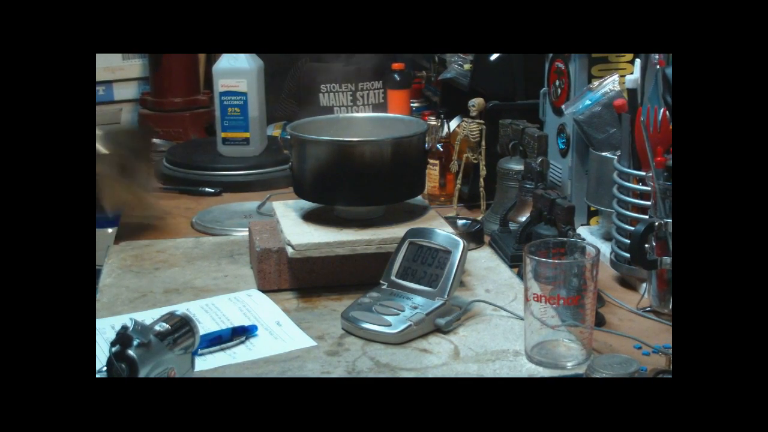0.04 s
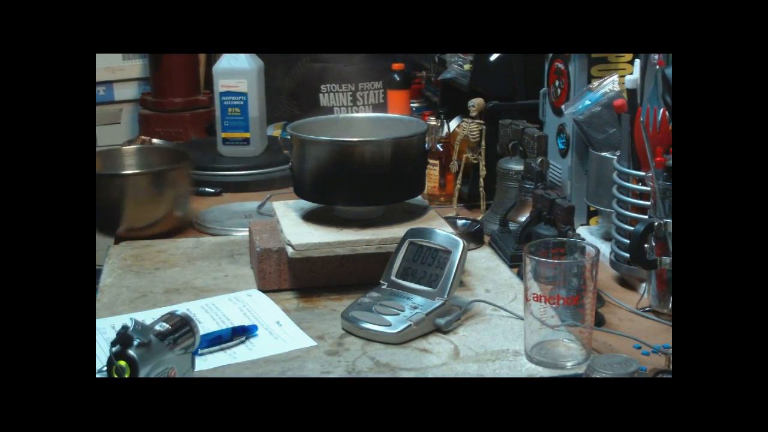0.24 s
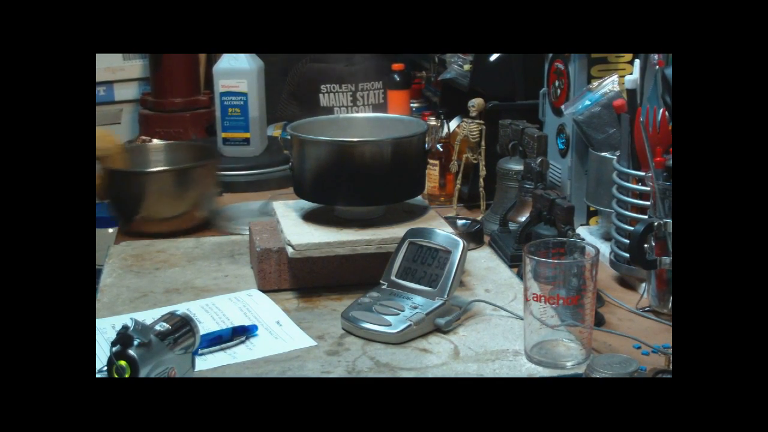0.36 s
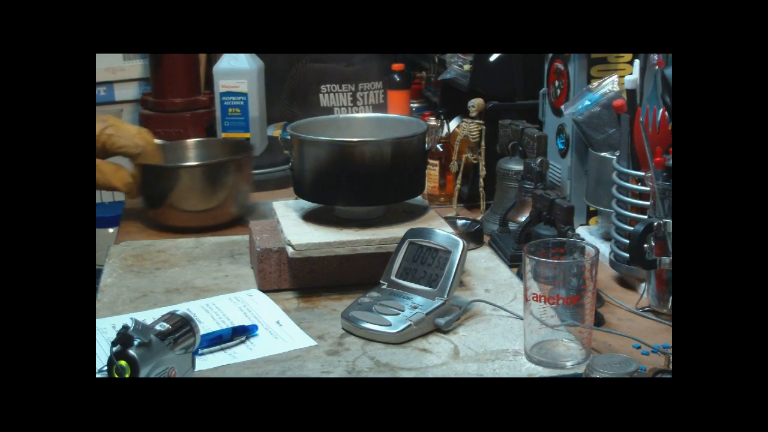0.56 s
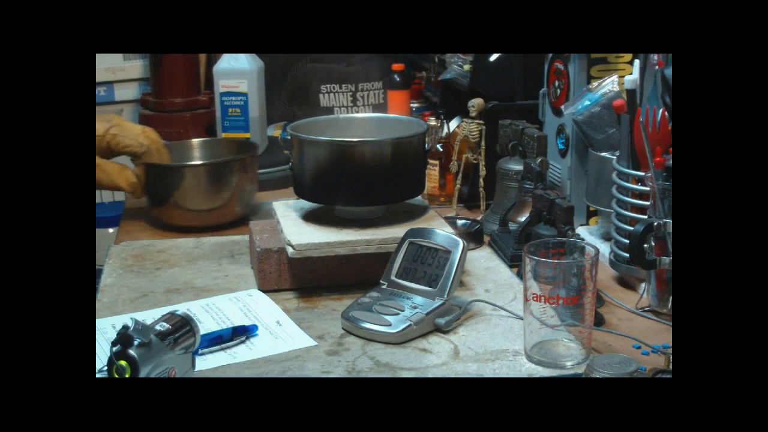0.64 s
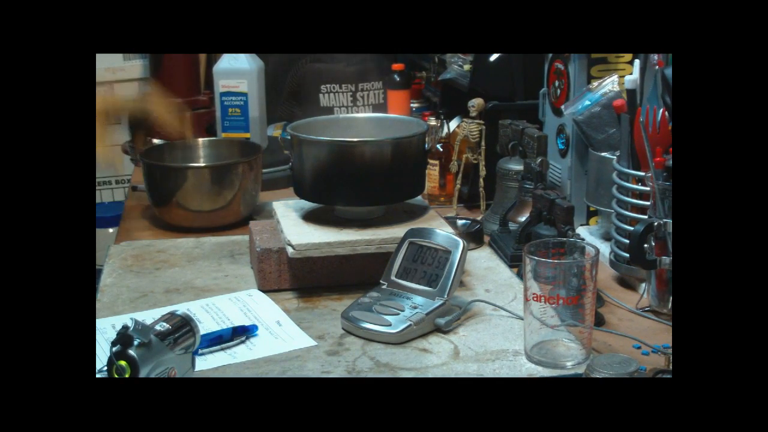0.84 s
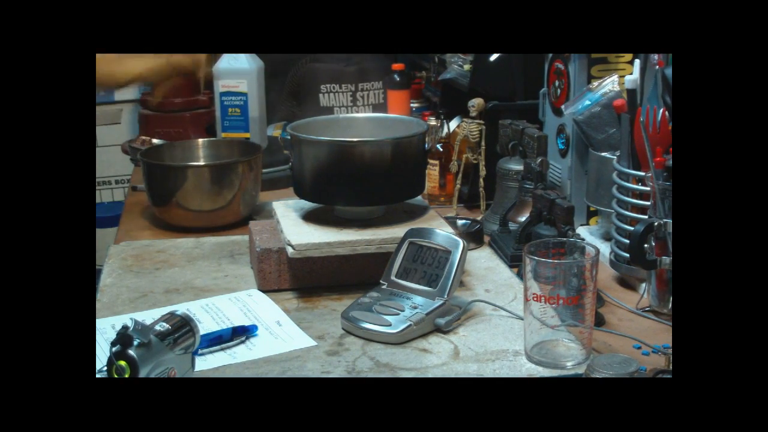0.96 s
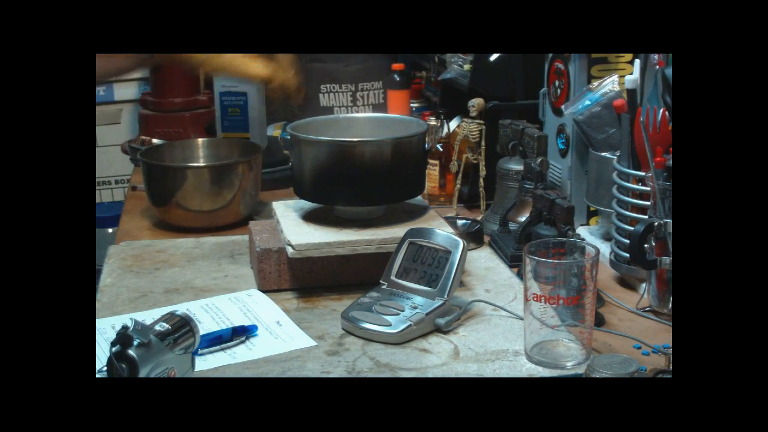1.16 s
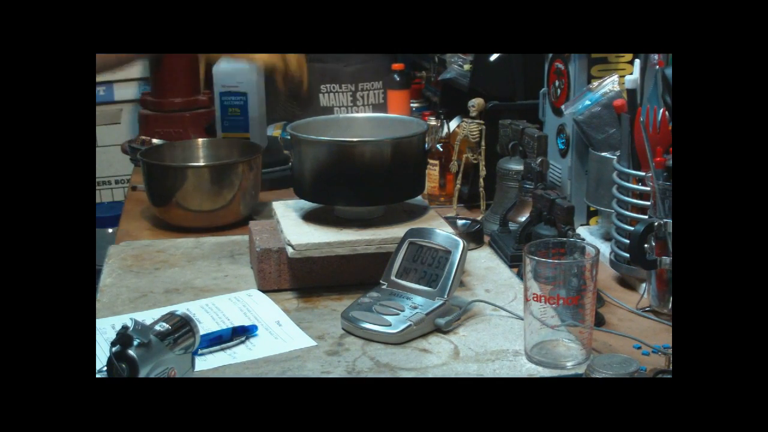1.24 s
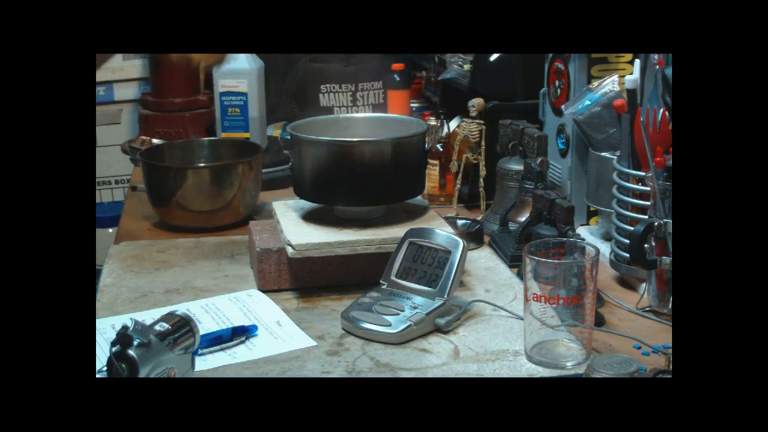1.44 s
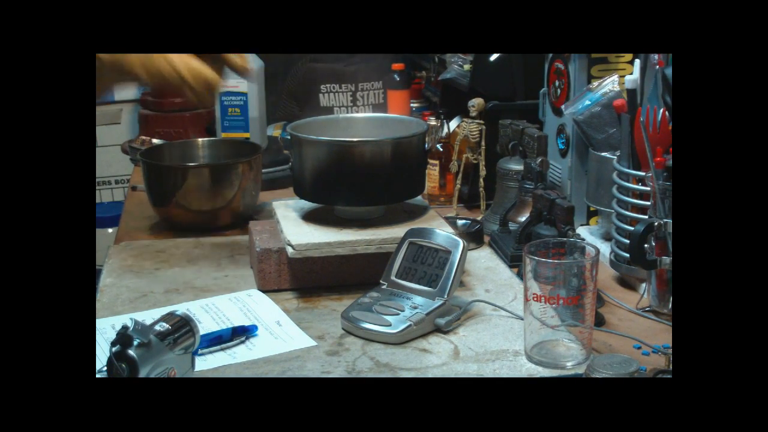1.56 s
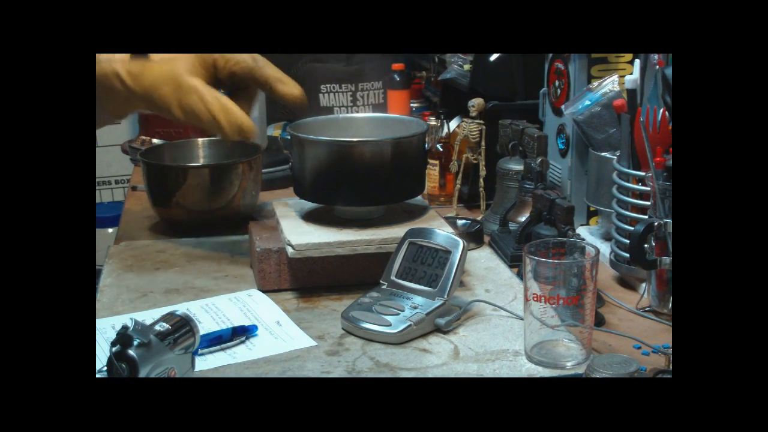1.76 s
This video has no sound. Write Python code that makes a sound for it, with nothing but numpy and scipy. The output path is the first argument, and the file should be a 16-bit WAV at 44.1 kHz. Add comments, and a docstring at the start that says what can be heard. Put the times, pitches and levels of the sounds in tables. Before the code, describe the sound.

Metal bowl lands on a bench with two quick hits, rattles briefly and settles indoors

```python
"""A low rumble and hiss fill a small room, where a steel bowl is set down on a workbench.
Its base knocks first: decaying modes give a hollow note, shaped noise the thuds, uneven noise the scuffs.
It then tips flat and chatters, each contact ringing the wall's modes in a bright clank, and shifts once more.
Last, a gloved hand taps and brushes something faintly, in short bands of noise.
Reflections, an echo and a tail place the bowl in the room; the rumble and hiss stay outside them."""
import sys
import numpy as np
from scipy import signal
from scipy.fft import rfft, irfft
from scipy.io import wavfile
from scipy.ndimage import uniform_filter1d, minimum_filter1d

SR = 44100
rng = np.random.default_rng(int(sys.argv[2]) if len(sys.argv) > 2 else 0)


def log_audio(samples):
    """Write samples as a 16-bit WAV file to the path given in sys.argv[1]."""
    # one column per channel
    frames = np.atleast_2d(samples).T
    # limit to full scale, then quantise
    limited = np.clip(frames, -1, 1)
    pcm = np.round(limited * 32767).astype(np.int16)
    wavfile.write(sys.argv[1], SR, pcm)


N = 79380  # samples, 1.8 s
TIME = np.arange(N) / SR  # seconds
SOFT_TOP_HZ = 6950  # top of the floor, scuffs and handling


def undb(db):
    """Amplitude ratio of a level in dB."""
    return 10 ** (np.asarray(db) / 20)


def unit(x):
    """Scale to an RMS of one."""
    return x / np.sqrt(np.mean(x ** 2))


def fade(t60):
    """Exponential decay, 60 dB down after t60 seconds."""
    return np.exp(-np.log(1000) * TIME / t60)


def delayed(x, seconds):
    """The same sound, starting later."""
    return np.concatenate([np.zeros(int(seconds * SR)), x])[:N]


def lowpass(x, hz):
    """Steep elliptic cut of everything above hz."""
    return signal.sosfilt(signal.ellip(8, .2, 70, hz, fs=SR, output="sos"), x)


def spectrum_level(points, f):
    """Amplitude at frequencies f, from (Hz, dB) points joined on a log frequency axis."""
    hz, db = np.array(points, float).T
    return undb(np.interp(np.log(f), np.log(hz), db))


def noise(points):
    """Noise with a spectrum of (Hz, dB) points."""
    f = np.maximum(np.fft.rfftfreq(N, 1 / SR), 1)
    return unit(irfft(rfft(rng.standard_normal(N)) * spectrum_level(points, f), N))


def band(hz, width_hz):
    """Noise through one broad resonance, twice for steep sides."""
    f = np.maximum(np.fft.rfftfreq(N, 1 / SR), 1)
    resonance = 1 / (1 + 1j * (f - hz ** 2 / f) / width_hz)
    return unit(irfft(rfft(rng.standard_normal(N)) * resonance ** 2, N))


def mode(hz, t60):
    """One decaying partial."""
    return np.sin(2 * np.pi * hz * TIME) * fade(t60)


def ring(modes):
    """All modes of a body after one blow."""
    return sum(undb(db) * mode(hz, t60) for hz, db, t60 in modes)


def partials(points, spacing_hz=62, top_hz=7500):
    """A crowd of unevenly spaced steady partials under a spectrum of (Hz, dB) points."""
    grid = np.arange(points[0][0], top_hz, spacing_hz)
    offset, phase = rng.random((200, 2))[:len(grid)].T
    f = grid + spacing_hz * offset
    lines = np.zeros(N // 2 + 1, complex)
    lines[(f * N / SR).astype(int)] = spectrum_level(points, f) * np.exp(2j * np.pi * phase)
    return unit(irfft(lines, N))


# Steady rumble and hiss of the room. Each row: frequency in Hz, relative level per Hz in dB.
FLOOR_SPECTRUM = [(10, -7.5), (22, 2), (55, -0.5), (81, -12), (132, -14), (220, -18.5), (450, -24.5),
                  (900, -27.5), (1500, -31), (4000, -32.5), (7000, -37)]
FLOOR_DB = -46.5


def room_floor():
    """Steady noise, strongest in the bass, under the whole scene."""
    return undb(FLOOR_DB) * lowpass(noise(FLOOR_SPECTRUM), SOFT_TOP_HZ)


# The base lands and rocks on the bench. Each row: start in seconds, relative level in dB.
BASE_LANDINGS = [(0.158, -1.5), (.1835, -6.5), (.1995, -25)]
# Modes of the base, loaded by the bench. Each row: frequency in Hz, relative level in dB, t60 in seconds.
BASE_MODES = [(149, -18, 0.11), (403, -7, 0.059), (512, -6.5, 0.041), (640, -3, 0.054), (685, 2.5, 0.049),
              (884.7, -15.5, 0.27), (1732, -20.5, 0.29), (1862, -33, 0.15), (2210, -30, 0.076),
              (2867, -19.5, 0.12), (2947, -18, 0.1), (4530, -37.5, 0.088), (4270, -50, .06)]
# Colour of the knock's contact noise. Each row: frequency in Hz, relative level in dB.
THUD_SPECTRUM = [(60, -10.5), (150, -3), (260, -8), (400, -0.5), (880, -1.5), (1000, -16), (2300, -21.5),
                 (2550, -29), (2950, -24.5), (3550, -28), (3900, -35), (4600, -25), (5300, -36.5),
                 (6400, -33.5), (8000, -66), (15000, -68)]
NOTE_DB, THUD_DB, THUD_T60_S = -12.5, -17.5, 0.1
KNOCK_PUSH_S = 0.0012  # time constant of the onset


def knock():
    """The base meets the bench: a hollow note on landing, and a dull thud each time it rocks."""
    push = 1 - np.exp(-TIME / KNOCK_PUSH_S)
    first_landing_s = BASE_LANDINGS[0][0]
    note = -undb(NOTE_DB) * delayed(push * ring(BASE_MODES), first_landing_s)
    # where thuds overlap, the stronger one sets the level
    thud = push * fade(THUD_T60_S)
    thuds = np.max([undb(db) * delayed(thud, start) for start, db in BASE_LANDINGS], axis=0)
    return note + undb(THUD_DB) * noise(THUD_SPECTRUM) * thuds


# The base scuffs along the bench. Each row: start in seconds, length in seconds, scrape level in dB,
# centre in Hz, resonance width in Hz, level of the steel's rasp in dB; friction varies both levels.
BASE_SCUFFS = [(0.198, 0.092, -46.5, 694, 324, -57), (0.272, .016, -36, 697, 120, -54.5),
               (.37, 0.059, -46, 690, 900, -41.5), (0.425, 0.1085, -49, 646, 1200, -43),
               (0.52, 0.1, -49, 710, 1200, -51)]
# The bench rumbles as the base drags over it. One row: start in seconds, length in seconds, level in dB,
# centre in Hz, resonance width in Hz.
BENCH_DRAG = (.215, .075, -44, 150, 170)
# Colour of the steel's rasp and shimmer. Each row: frequency in Hz, relative level in dB.
SHIMMER_SPECTRUM = [(300, -14), (1200, -3), (2200, -2), (3600, -4), (3850, -32), (4180, -32), (4300, -9),
                    (4850, -10), (5000, -34), (5300, -34), (5420, -14), (5850, -13), (6050, -32),
                    (6500, -34), (6640, -12), (7000, -13), (7300, -36), (15000, -60)]
SCUFF_ROUGH_DB = 1.5  # RMS swing of the friction


def scuffs(grip_hz=50, edge_s=0.0085):
    """Uneven friction under the base: a dull scrape, a rasp of the steel and a rumble in the bench."""
    def gate(start, length):
        rise = np.tanh((TIME - start) / edge_s)
        fall = np.tanh((TIME - start - length) / edge_s)
        return (rise - fall) / 2

    grip = unit(undb(SCUFF_ROUGH_DB * band(grip_hz, grip_hz)))
    out = 0
    for start, length, db, hz, width, rasp_db in BASE_SCUFFS:
        scrape = undb(db) * band(hz, width)
        rasp = undb(rasp_db) * partials(SHIMMER_SPECTRUM)
        out = out + gate(start, length) * grip * (scrape + rasp)
    start, length, db, hz, width = BENCH_DRAG
    rumble = gate(start, length) * undb(db) * band(hz, width)
    return lowpass(out + rumble, SOFT_TOP_HZ)


# Steel touches down as the bowl chatters and rattles to rest.
# Each row: start in seconds, relative level in dB, share of the free ring time.
STEEL_CONTACTS = [(0.3213, 1, .9), (0.3253, 2.5, .85), (0.332, .5, .7), (.3362, -.5, .7),
                  (0.3418, -5.5, .6), (0.3536, -14, .7), (.3582, -16, .7), (.3755, -12, .15),
                  (.424, -18, 1), (.4305, -19, .6), (.4655, -26, .5), (.493, -26, 1)]
# Modes of the bowl's wall. Each row: frequency in Hz, relative peak level in dB, free t60 in seconds.
WALL_MODES = [(1034, -22, .5), (1222, -3, .1), (1141, -25, .6), (1476, -7, .07), (1632, -6, .09),
              (1843, -7, .07), (2029, -3, .08), (2132, -11, .28), (2272, -7, .12), (2507, -4, .09),
              (2708, -11, .08), (2812, -6, .13), (2909, -1, .08), (3066, -5, .09), (3272, -7, .11),
              (3483, -6, .1), (3555, -18, .7), (4310, -23, .25), (4500, -25, .8), (4720, -21, .4),
              (5600, -23, .4), (5480, -27, .35), (6700, -26, .6), (6907, -28, .5), (9600, -55, .2),
              (10900, -60, .5)]
# Bright tick of steel at each contact. Each row: frequency in Hz, relative level in dB.
TICK_SPECTRUM = [(2000, -14), (6000, -2), (9500, 0), (14000, -22), (16000, -25)]
# Colour of the dense, short-lived modes of the steel. Each row: frequency in Hz, relative level in dB.
CLASH_SPECTRUM = [(60, -8.5), (350, -11), (900, -8.5), (1200, -1), (2200, 3), (3450, 0), (4000, -17),
                  (4400, -4.5), (4800, -11.5), (5150, -21.5), (5600, -7.5), (6300, -19.5), (6800, -16.5),
                  (7500, -33.5), (10000, -48), (15000, -63)]
# Modes of the bench under the falling bowl. Each row: frequency in Hz, level in dB, t60 in seconds.
BENCH_MODES = [(61.6, -26.5, 0.14), (141, -28, 0.018), (162.2, -45.5, 0.52), (206, -23, 0.026)]
WALL_DB, TICK_DB, CLASH_DB, SHIMMER_DB = -22, -39, -14.5, -33.5
CLASH_T60_S, SHIMMER_T60_S = .045, 0.62  # free ring times
TICK_SWING_T60_S = 0.016  # before the hardness power, which shortens it
TICK_HARDNESS = 2  # power of the blow: light contacts are duller
CONTACT_PUSH_S, BENCH_START_S = 0.00027, .323


def clank():
    """Quick contacts renew the wall's ringing, with tick, clash and shimmer; the bench thumps below."""
    def swing(t60):
        # the strongest swing still ringing sets the size, with its onset softened by the push
        swings = [undb(db) * delayed(fade(t60 * share), start) for start, db, share in STEEL_CONTACTS]
        return uniform_filter1d(np.max(swings, axis=0), int(CONTACT_PUSH_S * SR))

    wall = 0
    for (hz, db, t60), phase in zip(WALL_MODES, rng.random(len(WALL_MODES))):
        tone = np.sin(2 * np.pi * (hz * TIME + phase))
        wall = wall + undb(WALL_DB + db) * swing(t60) * tone
    tick = undb(TICK_DB) * noise(TICK_SPECTRUM) * swing(TICK_SWING_T60_S) ** TICK_HARDNESS
    clash = undb(CLASH_DB) * noise(CLASH_SPECTRUM) * swing(CLASH_T60_S)
    shimmer = undb(SHIMMER_DB) * partials(SHIMMER_SPECTRUM) * swing(SHIMMER_T60_S)
    thump = delayed(ring(BENCH_MODES), BENCH_START_S)
    return wall + tick + clash + shimmer + thump


# Light taps afterwards. Each row: start in seconds, level in dB, centre in Hz, resonance width in Hz,
# t60 in seconds, level of the accompanying ring in dB, centre of the ring in Hz.
LIGHT_TAPS = [(0.783, -41.5, 2000, 920, 0.087, -50.5, 990), (.816, -51, 370, 159, 0.099, -63, 1490),
              (1.47, -49.5, 2760, 5470, 0.27, -49, 1270), (1.558, -49.5, 1560, 2400, 0.13, -54, 1260)]
RING_T60_S, RING_WIDTH_HZ = .34, 700
CLICK_DB, CLICK_HZ, CLICK_T60_S = -2.5, 1860, 0.0071  # level relative to the tap
BRUSH_S, BRUSH_DB, BRUSH_HZ = 1.286, -54.5, 2960  # time and level of the swell's peak, centre
BRUSH_WIDTH_S = 0.028  # from the peak to 1/e of it


def handling():
    """Light damped taps, each with a click and a faint ring, and one soft brush of the glove."""
    taps = 0
    for start, db, hz, width, t60, ring_db, ring_hz in LIGHT_TAPS:
        faint_ring = undb(ring_db) * band(ring_hz, RING_WIDTH_HZ) * fade(RING_T60_S)
        click = undb(CLICK_DB) * band(CLICK_HZ, width_hz=2100) * fade(CLICK_T60_S)
        body = band(hz, width) * fade(t60)
        taps = taps + delayed(undb(db) * (body + click) + faint_ring, start)
    swell = np.exp(-((TIME - BRUSH_S) / BRUSH_WIDTH_S) ** 2)
    brush = undb(BRUSH_DB) * swell * band(BRUSH_HZ, width_hz=4000)
    return lowpass(taps + brush, SOFT_TOP_HZ)


TAIL_DB, TAIL_T60_S, TAIL_TREBLE_T60_S = -17, 0.91, .4  # level before the bass and treble are thinned
EARLY_DB, EARLY_T60_S = -16, 0.034  # level before the same thinning
RESPONSE_DELAY_S = .012
ECHO_DB, ECHO_S = -22, .0262  # a nearby wall


def room(x, split_hz=2800, bass_hz=300, absorb_hz=7500):
    """Early reflections off the cluttered bench, a wall echo and a bass-thin tail that dulls as it fades."""
    tail_noise, early_noise = rng.standard_normal((2, N))
    low = signal.sosfiltfilt(signal.butter(2, split_hz, fs=SR, output="sos"), tail_noise)
    tail = low * fade(TAIL_T60_S) + (tail_noise - low) * fade(TAIL_TREBLE_T60_S)
    early = early_noise * fade(EARLY_T60_S)
    response = undb(TAIL_DB) * tail / np.linalg.norm(tail)
    response = response + undb(EARLY_DB) * early / np.linalg.norm(early)
    thinning = signal.butter(2, [bass_hz, absorb_hz], "band", fs=SR, output="sos")
    response = delayed(signal.sosfilt(thinning, response), RESPONSE_DELAY_S)
    echo = undb(ECHO_DB) * delayed(x, ECHO_S)
    return x + echo + signal.fftconvolve(x, response)[:N]


def scene():
    """The bowl and the hand sound in the room, over the steady floor."""
    rumble_and_hiss = room_floor()
    sources = knock() + clank() + scuffs() + handling()
    return (room(sources) + rumble_and_hiss)[None]


CEILING, TOP_HZ = .42, 15600  # limiter threshold as a share of full scale, top of the sound


def record(dry):
    """A quick limiter holds the loudest peaks; the top is cut."""
    gain = CEILING / np.maximum(np.abs(dry), CEILING)
    # hold, then smooth, the gain over about 3 ms around each peak
    gain = uniform_filter1d(minimum_filter1d(gain, size=129), size=129)
    return lowpass(dry * gain, TOP_HZ)


dry = scene()
out = record(dry)
log_audio(out)
```